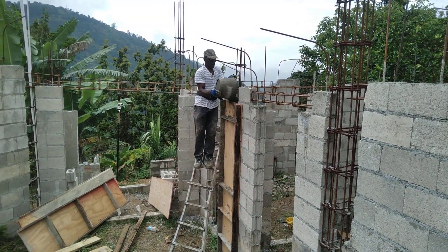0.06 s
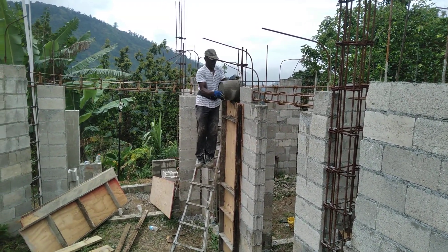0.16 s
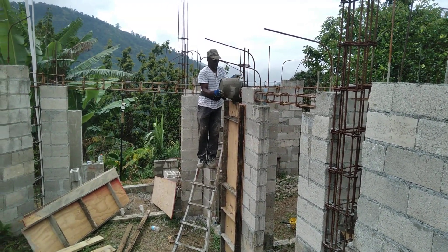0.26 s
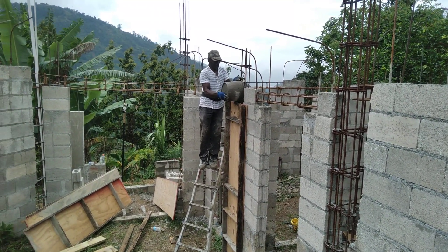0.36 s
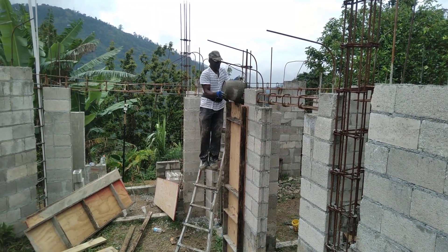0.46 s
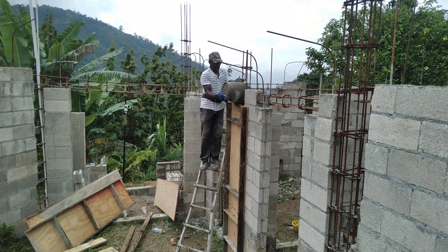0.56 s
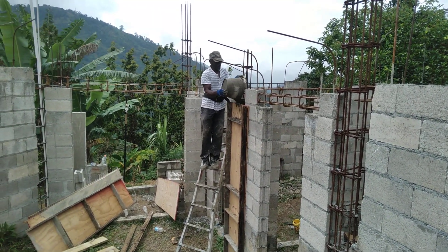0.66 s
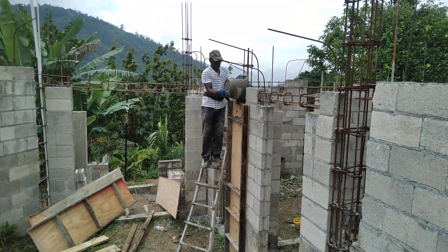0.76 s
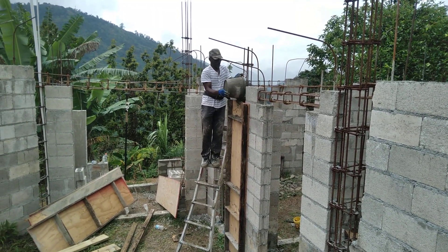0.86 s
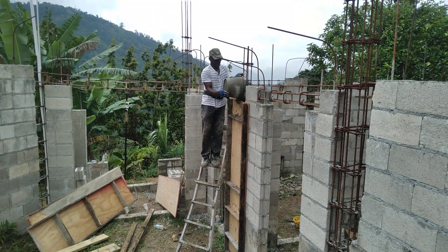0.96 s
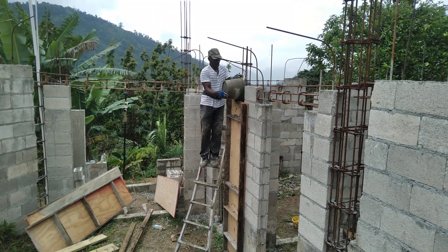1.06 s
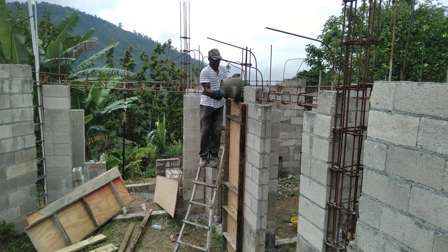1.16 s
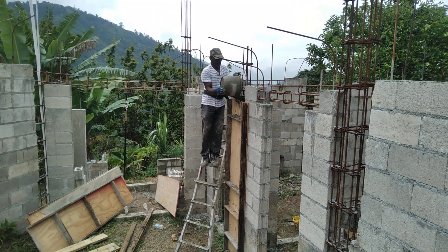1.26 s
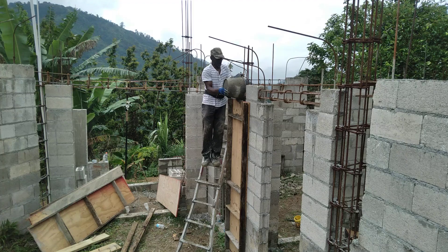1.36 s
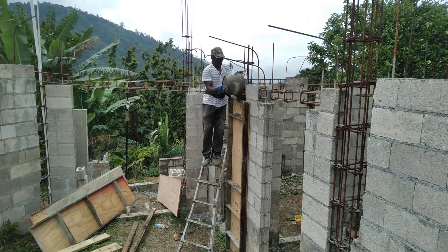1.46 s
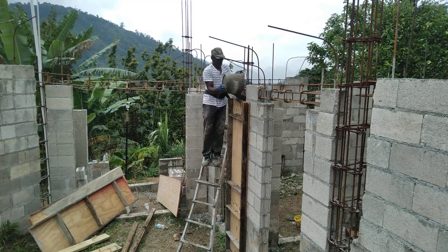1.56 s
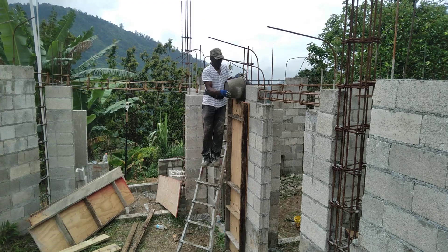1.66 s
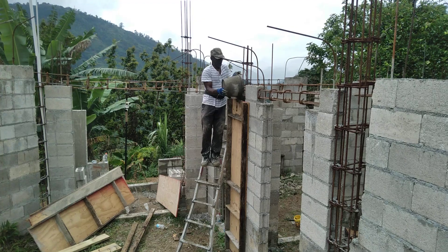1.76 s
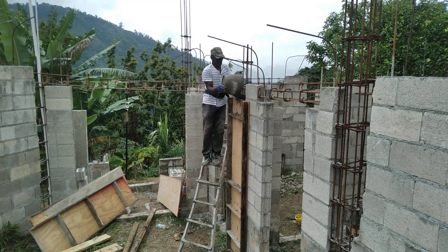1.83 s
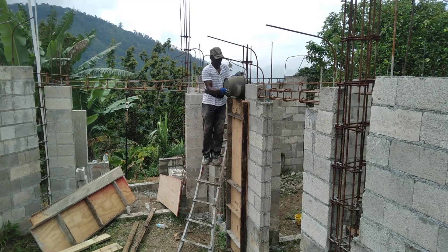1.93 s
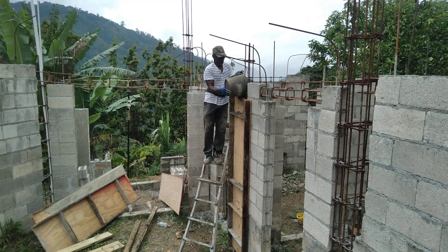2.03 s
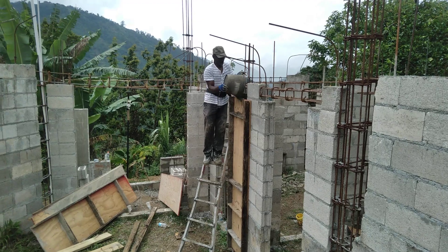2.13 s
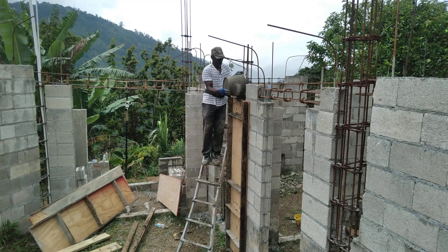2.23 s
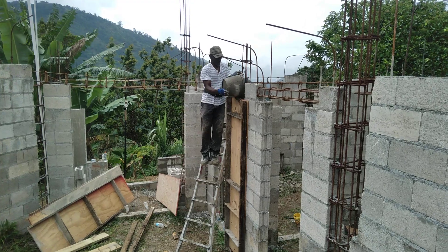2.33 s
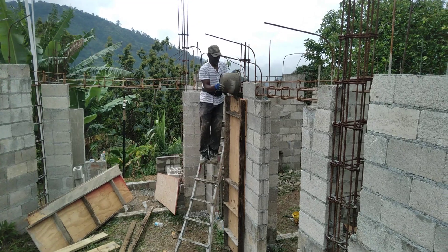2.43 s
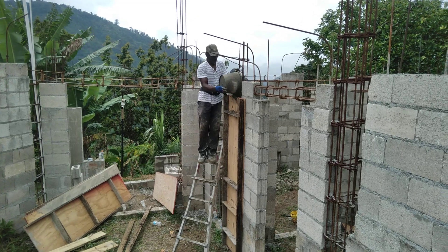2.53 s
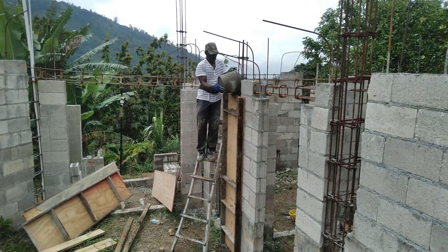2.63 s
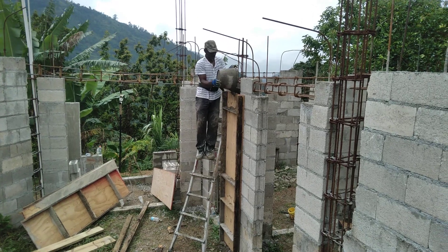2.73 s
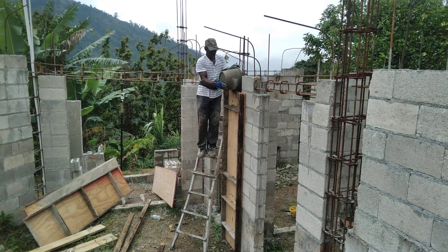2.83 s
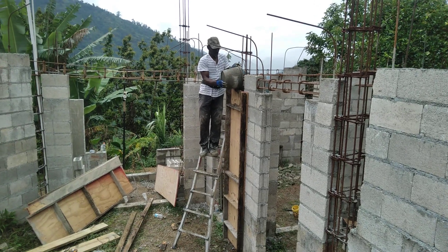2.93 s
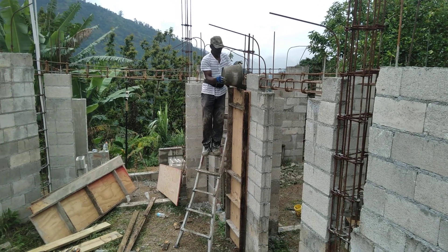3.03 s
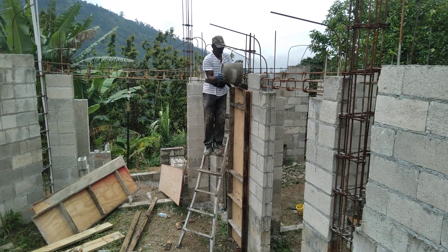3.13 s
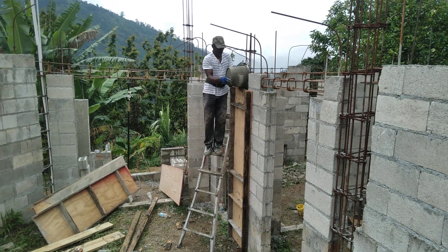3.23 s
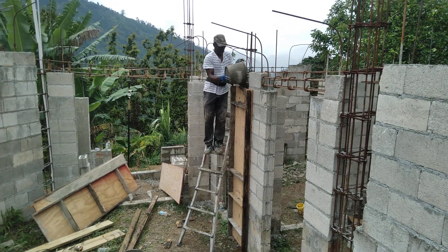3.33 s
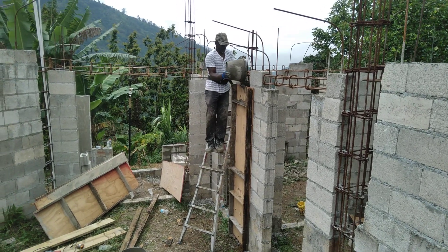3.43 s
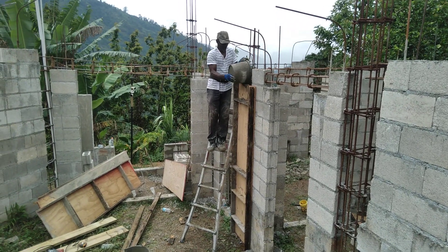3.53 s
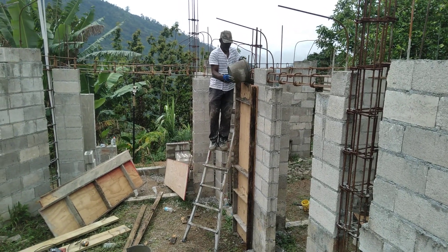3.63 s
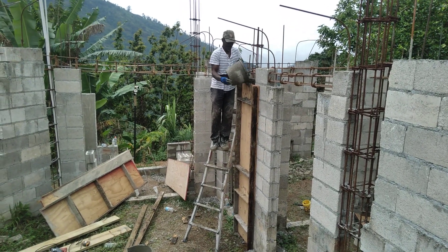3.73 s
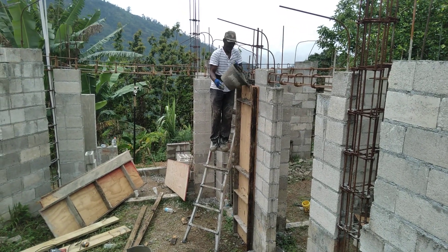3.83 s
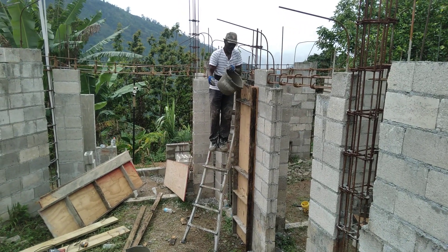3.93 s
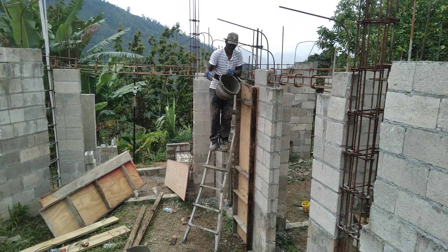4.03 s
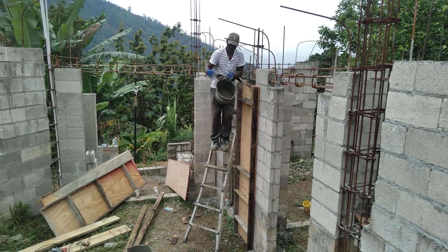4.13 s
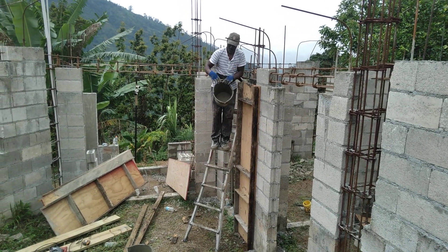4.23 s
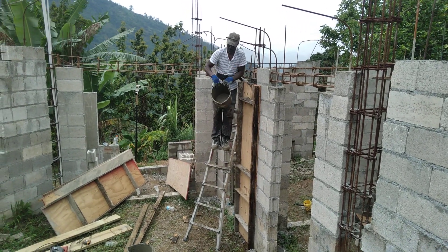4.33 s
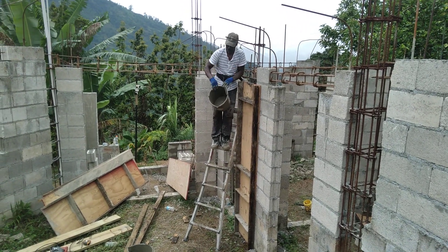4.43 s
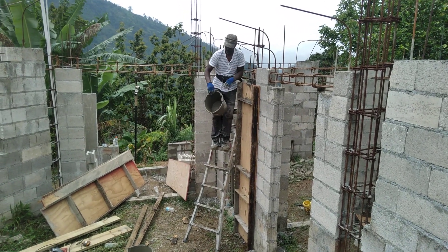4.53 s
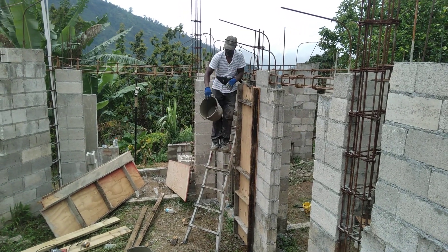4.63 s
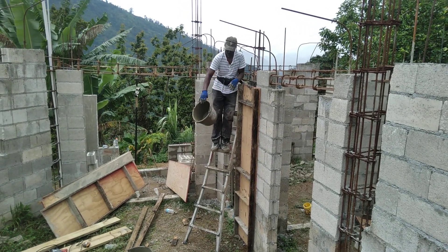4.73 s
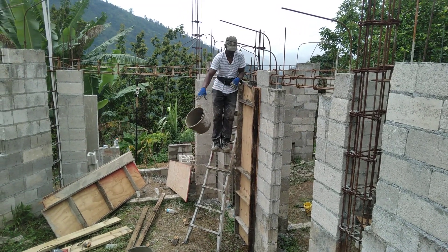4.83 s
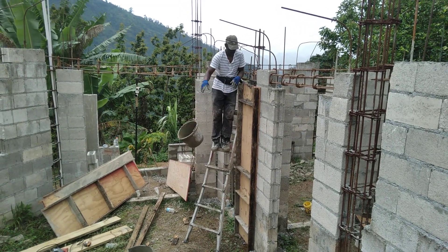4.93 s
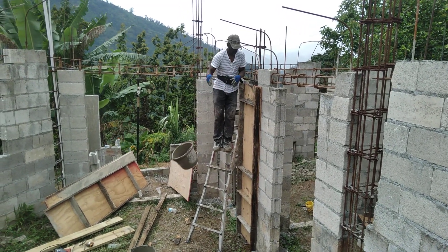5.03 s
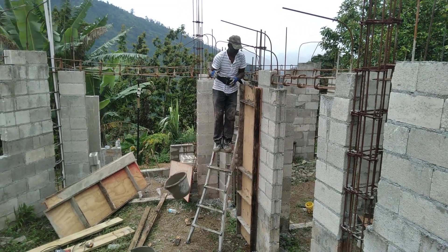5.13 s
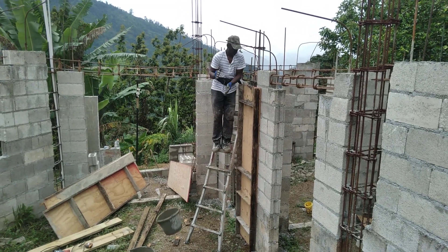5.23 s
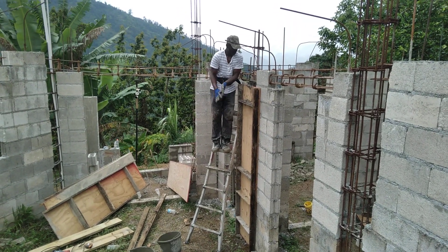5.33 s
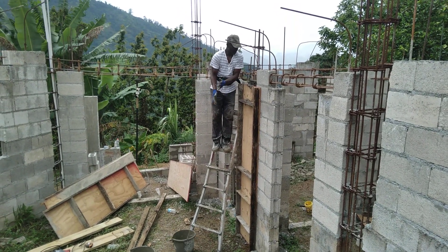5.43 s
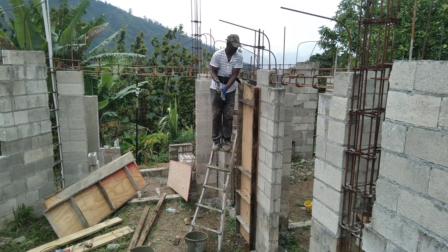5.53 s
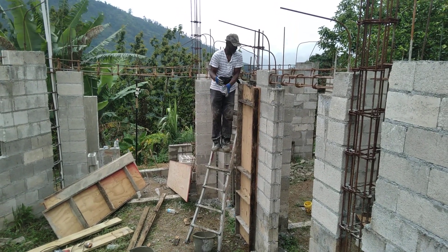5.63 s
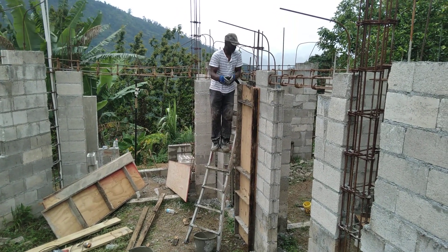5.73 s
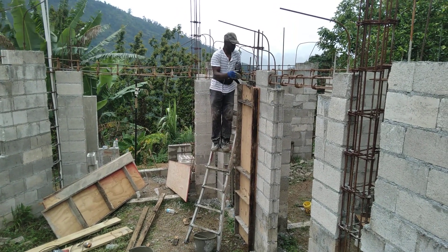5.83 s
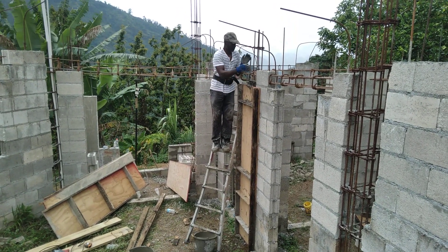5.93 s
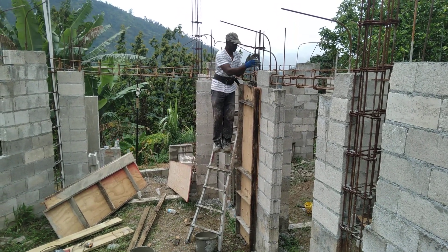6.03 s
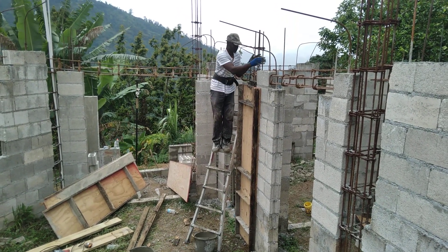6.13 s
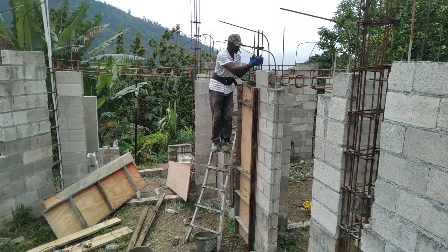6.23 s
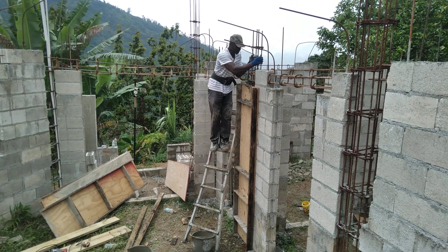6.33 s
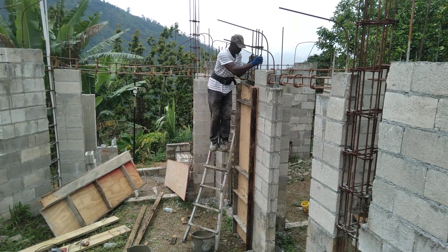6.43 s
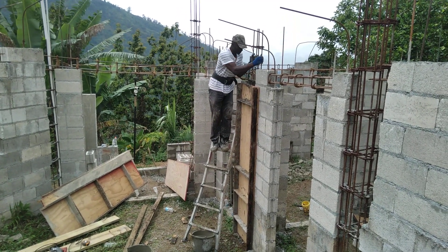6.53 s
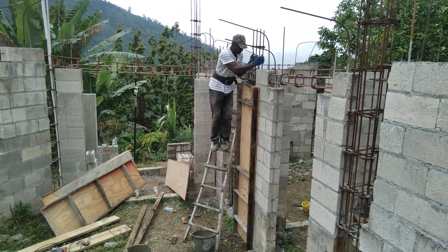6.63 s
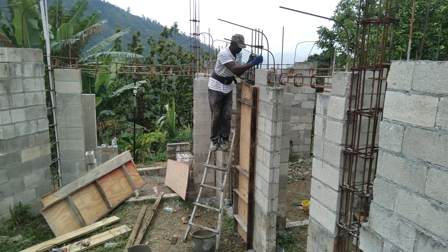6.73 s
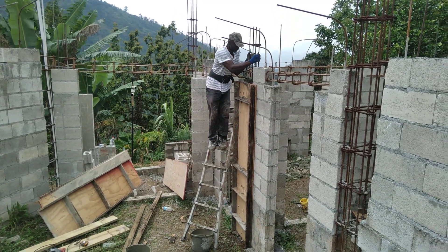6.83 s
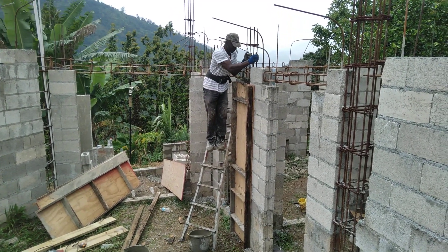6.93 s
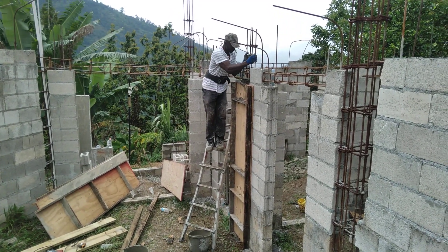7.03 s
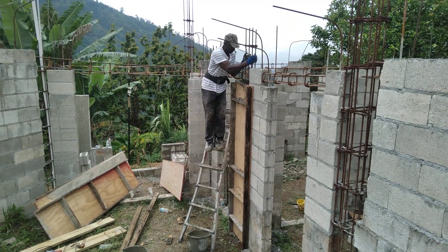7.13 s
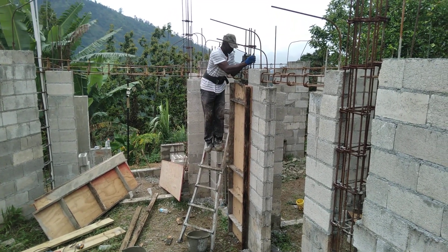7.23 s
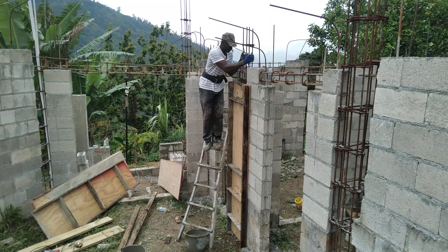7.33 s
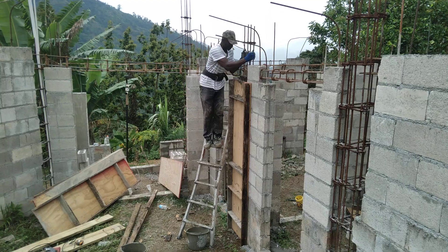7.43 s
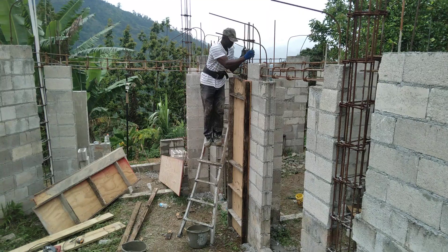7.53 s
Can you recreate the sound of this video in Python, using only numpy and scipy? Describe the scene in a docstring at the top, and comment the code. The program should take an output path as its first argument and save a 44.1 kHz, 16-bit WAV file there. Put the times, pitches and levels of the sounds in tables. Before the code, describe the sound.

Outdoors among block walls, a builder shakes a loaded plastic bucket against a wooden form: dull thumps, woody double clacks and gritty wet slides, with small clinks. After a short pause the empty bucket hits stony ground with a loud hollow boom, bounces and scuffs over gravel. Then only faint leaves, wind and tiny rustles. Microphone a few metres off, with short wall echoes.

```python
"""Outdoors, by a wooden form and block walls: a builder on a ladder shakes and knocks a plastic bucket
on the form so that wet concrete slides out, then lets the empty bucket fall on stony ground.
Knocks are noise crunches plus ringing modes, sliding is coloured grains, the falling bucket a set of modes.
Walls throw back short echoes; leaves hiss, chirps are sines, light wind buffets the microphone as low noise."""
import sys
import numpy as np
from scipy import signal
from scipy.fft import rfft, irfft
from scipy.io import wavfile
from scipy.ndimage import uniform_filter1d

SR = 44100
rng = np.random.default_rng(int(sys.argv[2]) if len(sys.argv) > 2 else 0)


def pcm_store(signal):
    """Save signal as 16-bit PCM."""
    levels = np.round(np.clip(np.atleast_2d(signal), -1, 1) * 32767)
    wavfile.write(sys.argv[1], SR, levels.astype(np.int16).T)


N = 333832
TIME = np.arange(N) / SR


def from_db(db):
    """Level in dB to amplitude."""
    return 10 ** (np.asarray(db) / 20)


def unit_energy(x):
    """Scale to a sum of squares of 1."""
    return x / np.sqrt(np.sum(x ** 2) + 1e-20)


def at_hz(points, hz):
    """Read a table along a log-frequency axis."""
    table = np.array(points)
    return np.interp(np.log(hz + 1), np.log(table[:, 0]), table[:, 1])


def in_time(rows):
    """Each column of a curve at every sample."""
    s, *columns = np.vstack(rows).T
    return [np.interp(TIME, s, column) for column in columns]


def wander(per_s):
    """Random level: a new normal value per_s times a second, straight lines between."""
    return np.interp(TIME * per_s, np.arange(SR), rng.standard_normal(SR))


def through(x, response):
    """Pass a sound through an impulse response."""
    return signal.fftconvolve(np.atleast_2d(x), np.atleast_2d(response), axes=-1)[:, :N]


def colour(x, spectrum, size=4096):
    """Causal (minimum-phase) filter with this spectrum; white input keeps its power."""
    gain = from_db(at_hz(spectrum, np.arange(size // 2 + 1) * SR / size))
    cepstrum = irfft(np.log(gain))
    cepstrum[1:size // 2] *= 2
    cepstrum[size // 2 + 1:] = 0
    return through(x, unit_energy(irfft(np.exp(rfft(cepstrum)))))


# Left-right likeness of diffuse sound. Each row: frequency in Hz, likeness 0-1.
LIKENESS_BY_HZ = [(60, 1), (290, 0.86), (640, 0.2), (1400, 0), (3000, 0), (12000, 0)]


def diffuse(size):
    """White stereo noise, alike in the bass and unrelated in the treble."""
    alike = np.clip(at_hz(LIKENESS_BY_HZ, np.arange(size // 2 + 1) * SR / size), -1, 1)
    mid, side = rfft(rng.standard_normal((2, size)))
    spectra = np.sqrt(1 + alike) * mid + np.sqrt(1 - alike) * side * [[1], [-1]]
    return irfft(spectra / np.sqrt(2), size)


def ring(modes):
    """One second of decaying sines, from modes of (Hz, dB, t60 s)."""
    t = TIME[:SR]
    return sum(from_db(db - 60 * t / t60) * np.sin(2 * np.pi * hz * t) for hz, db, t60 in modes)


def add(track, s, sound):
    """Mix a sound in at time s."""
    start = max(int(s * SR), 0)
    track[start:start + len(sound)] += sound[:N - start]


def pan(pan_db):
    """Left and right gains; positive favours the left."""
    return from_db([[pan_db / 2], [-pan_db / 2]])


def radiate(x, corner_hz):
    """A small body gives off little deep bass."""
    return signal.sosfilt(signal.butter(2, corner_hz, "high", fs=SR, output="sos"), x)


def soften(x, corner_hz):
    """A yielding contact lasts a while, so it rings no high notes."""
    return signal.sosfilt(signal.butter(2, corner_hz, fs=SR, output="sos"), x)


def distant(x, corner_hz):
    """Distance takes off the top."""
    return signal.sosfilt(signal.butter(3, corner_hz, fs=SR, output="sos"), x)


def grains(size, spread_db=4.0, per_s=5000):
    """Tiny clicks at random moments and of very uneven size; rms 1."""
    sizes = from_db(spread_db * np.minimum(rng.exponential(1, size), 4)) * rng.choice([-1, 1], size)
    clicks = sizes * (rng.random(size) < per_s / SR)
    return unit_energy(clicks) * np.sqrt(size)


def crunch(decay_s, snap=0.42, rise_s=0.0025, size=8192):
    """A contact: one snap, then sand crushed under it."""
    t = TIME[:size]
    envelope = np.exp(-t / max(decay_s, .001)) * (1 - np.exp(-t / rise_s))
    burst = unit_energy(grains(size) * envelope)
    burst[0] += snap
    return unit_energy(burst)


def contact(decay_s, spectrum, depth_db=3.0, count=22):
    """A crunch in the colour of the body; each contact point favours resonances of its own."""
    hz = np.geomspace(400, 9000, count)
    spot = np.c_[hz, depth_db * rng.standard_normal(count)]
    return unit_energy(colour(colour(crunch(decay_s), spot, size=1024), spectrum)[0])


# Background spectra. Each row: frequency in Hz, density in dB per Hz.
LEAF_SPECTRUM = [(900, -12), (1400, -2), (2200, -0.5), (3800, 0), (6000, -4), (8500, -7.5), (10200, -8),
                 (12000, -22), (16000, -29)]
VALLEY_SPECTRUM = [(60, -7.5), (150, 2.5), (330, -2), (550, -4), (850, -10), (1500, -18.5), (4000, -45.5),
                   (10000, -38.5), (16000, -56)]
# Relative levels of the open air. Each row: time in seconds, leaf hiss in dB, valley wash in dB.
AIR_LEVELS = [(0.0, -56.5, -54.5), (1.3, -65, -61), (2.5, -60.5, -58), (4.24, -65, -61.5),
              (5.3, -59.5, -57), (6.2, -62.5, -60.5), (7.57, -61.5, -54.5)]


def outdoors(leaves_db=3, valley_db=0, stir_db=0.62, stirs_per_s=9):
    """Leaves hiss as the breeze stirs them, over the dull wash of the valley."""
    hiss, wash = in_time(AIR_LEVELS)
    stir = stir_db * wander(stirs_per_s)
    leaves = from_db(hiss + leaves_db + stir) * colour(diffuse(N), LEAF_SPECTRUM)
    valley = from_db(wash + valley_db + stir) * colour(diffuse(N), VALLEY_SPECTRUM)
    return leaves + valley


# Rumble spectrum. Each row: frequency in Hz, density in dB per Hz.
WIND_SPECTRUM = [(15, 3), (35, -0.5), (70, -4), (110, -16), (170, -22.5), (300, -40), (700, -70)]
# Strength of the breeze. Each row: time in seconds, relative rumble level in dB.
GUST_LEVELS = [(0.0, -60), (0.5, -55), (1.4, -58), (2.4, -50), (2.8, -48.5), (3.3, -49), (3.95, -46),
               (4.17, -49), (4.3, -42.5), (4.8, -51), (5.08, -43.5), (5.25, -37.5), (5.75, -50),
               (6.12, -58), (6.45, -44), (7.15, -48.5), (7.43, -42.5), (7.57, -47)]
# Puffs on the microphone. Each row: time in seconds, relative level in dB.
PUFF_EVENTS = [(3.952, -26), (3.987, -21), (4.34, -29.5), (5.3, -27), (5.385, -18.5), (6.244, -26.5),
               (6.565, -28), (7.447, -26)]


def wind(level_db=1.5, pan_db=-3, shared=0.72, lumpy_db=4.5, lumps_per_s=11,
         puff_db=0, puff_hz=86, puff_t60_s=0.03):
    """Partly shared eddies rumble unevenly on the microphone ports; a few arrive as single puffs."""
    eddies = rng.standard_normal((2, N)) + shared * rng.standard_normal(N)
    uneven = lumpy_db * wander(lumps_per_s)
    rumble = from_db(in_time(GUST_LEVELS)[0] + level_db + uneven) * colour(eddies, WIND_SPECTRUM)
    onset = (1 - np.exp(-TIME[:SR] / 0.0025)) ** 2
    puffs = np.zeros(N)
    for s, db in PUFF_EVENTS:
        add(puffs, s - .005, 2 * onset * ring([(puff_hz, db + puff_db, puff_t60_s)]))
    return (rumble + puffs) * pan(pan_db)


# Grit spectrum. Each row: frequency in Hz, density in dB per Hz.
GRIT_SPECTRUM = [(900, -14), (1800, -0.5), (2800, 3.5), (4500, 2.5), (7000, -3), (8500, -8.5),
                 (10300, -3.5), (12000, -46), (16000, -49.5)]


def crumbs(per_s=12, level_db=-44, spread_db=1.8):
    """Stray bits of grit tick faintly now and then."""
    sizes = from_db(level_db + spread_db * np.minimum(rng.exponential(1, N), 3))
    return colour(sizes * (rng.random(N) < per_s / SR), GRIT_SPECTRUM)


# Shakes of the bucket: it hits the form, rebounds and hits again; levels are relative.
# Each row: start in seconds, first clack in dB, rebound delay in seconds, second clack in dB,
# thump in dB, grit in dB re the clack, concrete let go in dB.
SHAKE_EVENTS = [(0.032, -53, .015, -35.5, -52.5, -13.5, -43.5), (0.207, -51, .030, -42, -46, 2, -38),
                (0.453, -38.5, 0.011, -60, -34, -7.5, -43), (0.611, -41.5, .024, -37.5, -45, -7, -45),
                (0.843, -41.5, 0.032, -38.5, -47.5, -8.5, -42.5),
                (1.094, -36.5, .012, -45.5, -48, -1, -46.5), (1.448, -46, 0.0087, -42, -38, -10.5, -47),
                (1.711, -36, .040, -31.5, -37, -8, -38.5), (2.008, -31.5, .045, -41.5, -25.5, -6, -35.5),
                (2.327, -33, .020, -30, -37.5, -7.5, -32.5), (2.621, -32, 0.025, -38.5, -31.5, -8, -38),
                (2.905, -34, .033, -38, -35, -7.5, -43), (3.292, -27.5, .015, -42, -37, -9.5, -41),
                (3.579, -42, .014, -58, -44.5, -5, -57)]
# Lone bumps on the boards. Each row: start in seconds, relative clack in dB, relative thump in dB.
BUMP_EVENTS = [(0.693, -39.5, -50.5), (4.392, -47, -60), (4.459, -57, -55)]
# Kinds of contact: thump pitch in Hz, thump weight in dB, crunch decay in seconds.
FIRST_CONTACT, SECOND_CONTACT = (226.5, 0, 0.0074), (293, -7, 0.01)
BUMP_CONTACT, BUMP_GRIT_DB = (455, 0, .013), -16


def blows():
    """Two blows per shake, one per bump: (s, clack dB, thump dB, grit dB re the clack, contact)."""
    hits = []
    for s, first, rebound_s, second, thump, grit, _ in SHAKE_EVENTS:
        hits.append((s, first, thump, grit, FIRST_CONTACT))
        hits.append((s + rebound_s, second, thump, grit, SECOND_CONTACT))
    for s, clack, thump in BUMP_EVENTS:
        hits.append((s, clack, thump, BUMP_GRIT_DB, BUMP_CONTACT))
    return hits


# Boards of the form. Each row: mode in Hz, level in dB, t60 in seconds.
FORM_MODES = [(157, -18, 0.25), (191, 0, 0.069), (283, -11.5, 0.22), (333, -12, 0.18), (372, -20.5, 0.15),
              (482, -12.5, 0.05)]
# Rim on wood. Each row: frequency in Hz, density in dB per Hz.
CLACK_SPECTRUM = [(250, -22.5), (500, 2), (700, -4.5), (850, 5.5), (980, -3), (1300, -6.5), (1700, -5.5),
                  (2400, -15.5), (5000, -32), (13000, -39)]


def knocks(clack_db=23, grit_db=23.5, thump_db=7.5, boards_db=5.0, thump_t60_s=0.093):
    """The loaded bucket gives a dead thump, the boards ring on and the rim clacks on sandy wood."""
    rim, body = np.zeros((2, N))
    boards = ring(FORM_MODES)
    for s, clack, thump, grit, (hz, weight_db, decay_s) in blows():
        add(rim, s, from_db(clack + clack_db) * contact(decay_s, CLACK_SPECTRUM))
        add(rim, s, from_db(clack + grit + grit_db) * contact(decay_s, GRIT_SPECTRUM, depth_db=-0.5))
        add(body, s + 0.0017, from_db(thump + weight_db + thump_db) * ring([(hz, 0, thump_t60_s)]))
        add(body, s, from_db(thump + weight_db + boards_db) * boards)
    return radiate(rim + soften(body, 1300), 240)


LUMP_DB, LUMP_LAG_S = -1.5, 0.0033


def lumps(hz=78, t60_s=0.49, rise_s=0.0047):
    """The concrete of each shake lands softly and sets the tall hollow of the form humming."""
    onset = 1 - np.exp(-TIME[:SR] / rise_s)
    out = np.zeros(N)
    for s, _, rebound_s, _, _, _, concrete in SHAKE_EVENTS:
        add(out, s + rebound_s + LUMP_LAG_S, onset * ring([(hz, concrete + LUMP_DB, t60_s)]))
    return out


# The slide is fastest just after the second contact.
SLIDE_LAG_S, SLIDE_SWELL_S, SLIDE_FADE_S = .016, 0.022, 0.023
RASP_DB, RASP_DB_PER_S = -1, -9   # stones rasp less as the bucket empties
SLIDE_GRIT_DB = -7.5


def slides():
    """Every shake lets concrete slide: (s, rasp dB, hollow dB, grit dB, swell s, fade s)."""
    strokes = []
    for s, _, rebound_s, clack, _, grit, concrete in SHAKE_EVENTS:
        peak_s = s + rebound_s + SLIDE_LAG_S
        rasp = concrete + RASP_DB + RASP_DB_PER_S * s
        strokes.append((peak_s, rasp, concrete, clack + grit + SLIDE_GRIT_DB, SLIDE_SWELL_S, SLIDE_FADE_S))
    return strokes


# Hollow of the bucket. Each row: frequency in Hz, density in dB per Hz.
HOLLOW_SPECTRUM = [(50, -29.5), (78, -7), (110, -11.5), (220, 2), (295, -1), (390, -2), (470, -17.5),
                   (620, -15.5), (1000, -45.5)]


def sliding(rows, treble, stutter_db=1.5, slips_per_s=170):
    """Grains swell and fade, stuttering as if catching and slipping, and sound a hollow body."""
    rasp, hollow, grit = drive = np.zeros((3, N))
    for s, rasp_db, hollow_db, grit_db, swell_s, fade_s in rows:
        stroke = np.exp(-np.maximum((s - TIME) / swell_s, (TIME - s) / fade_s).clip(0, 20))
        drive += from_db([[rasp_db], [hollow_db], [grit_db]]) * stroke
    slips = from_db(stutter_db * wander(slips_per_s))
    layers = [(rasp, CLACK_SPECTRUM), (hollow, HOLLOW_SPECTRUM), (grit, treble)]
    return sum(colour(level * slips * grains(N, per_s=1300), spectrum) for level, spectrum in layers)


# Clinks of stones and the rim on steel, and one hard clack of the bucket on the form.
# Each row: start in seconds, relative level in dB, pitch in Hz, ring in dB added to the row's own level.
CLINK_EVENTS = [(1.221, -50.5, 2850, -18), (1.537, -43, 2330, -25), (2.116, -44.5, 2513, 1),
                (2.120, -43, 1180, -3), (2.473, -50, 2660, 8), (2.473, -49, 4700, -3),
                (2.978, -47.5, 10300, -20), (3.104, -59, 3020, -7), (3.168, -37, 3310, -13),
                (3.167, -38.5, 7340, -11), (3.293, -31, 1100, -13)]
CLINK_CRUNCH_S = 0.0088


def clinks(level_db=25, t60_s=0.09, tick_db=-1):
    """A rough tick around one pitch, and a short damped ring with its overtones."""
    out = np.zeros(N)
    for s, db, hz, ring_db in CLINK_EVENTS:
        around = [(hz / 4, -30), (hz / 2, -10), (hz, 0), (hz * 1.54, -5), (hz * 3, -22)]
        tick = colour(crunch(CLINK_CRUNCH_S), around)[0]
        tone = unit_energy(ring([(hz, 0, t60_s), (hz * 1.9, -6, t60_s / 2), (hz * 1.4, -5, t60_s / 2)]))
        add(out, s, from_db(db + level_db + tick_db) * tick)
        add(out, s, from_db(db + level_db + ring_db) * tone)
    return signal.sosfilt(signal.butter(6, 10800, fs=SR, output="sos"), out)


DIP_STARTS_S, DIP_S = [1.326, 3.885, 4.274], .05


def dipping(x, depth_db=-13, corner_hz=800):
    """The treble dips briefly now and then, while the bass carries on."""
    dips = sum(1. * ((TIME > start) & (TIME < start + DIP_S)) for start in DIP_STARTS_S)
    dipped = uniform_filter1d(dips, size=300)
    bass = signal.sosfiltfilt(signal.butter(2, corner_hz, fs=SR, output="sos"), x)
    return bass + (x - bass) * from_db(depth_db * dipped)


# Faint chirps from the bushes. Each row: centre in seconds, level in dB.
CHIRP_EVENTS = [(3.086, -59), (4.115, -65), (6.47, -64), (7.0, -66)]


def chirps(hz=7580, length_s=0.012, glide_hz_per_s=-3000):
    """Short, thin whistles that fall slightly."""
    t = TIME[:SR // 5] - .1
    bell = np.exp(-(t / length_s) ** 2 / 2)
    whistle = bell * np.sin(2 * np.pi * (hz + glide_hz_per_s * t / 2) * t)
    out = np.zeros(N)
    for s, db in CHIRP_EVENTS:
        add(out, s + t[0], from_db(db) * whistle)
    return out


# Faint rustles of handling and a few falling crumbs.
# Each row: peak in seconds, relative level in dB, swell in seconds.
RUSTLE_EVENTS = [(3.215, -58.5, .027), (4.395, -60, 0.013), (4.83, -61.5, 0.048), (5.04, -62, 0.0037),
                 (5.338, -60.5, 0.0033), (6.649, -60.5, .02), (7.264, -59, 0.0043), (7.396, -52, .002),
                 (7.498, -54.5, 0.0073)]
RUSTLE_HOLLOW_DB, RUSTLE_GRIT_DB, RUSTLE_FADE_S = 3.5, 3.5, 0.024


def rustles():
    """Faint rustles of handling and a few falling crumbs, as strokes all of one colour."""
    return [(s, db, db + RUSTLE_HOLLOW_DB, db + RUSTLE_GRIT_DB, swell_s, RUSTLE_FADE_S)
            for s, db, swell_s in RUSTLE_EVENTS]


# Falling bucket on the ground; levels are relative.
# Each row: start in seconds, clack in dB, boom in dB, gravel in dB, pitch in Hz.
LANDING_EVENTS = [(5.391, -17, -2, -22.5, 339.5), (5.4021, -28, -25, -29, 340),
                  (5.4081, -46, 2.5, -29, 300.2), (5.4713, -65, -21.5, -43.5, 312.6),
                  (5.562, -36, -41, -27, 343), (5.591, -31.5, -35, -34, 293), (5.641, -58, -30, -47, 304),
                  (5.713, -36, -37, -58, 298), (5.746, -31, -37, -33.5, 314),
                  (5.986, -41, -36.5, -48.5, 573)]
# Modes of the empty bucket. Each row: multiple of its pitch, level in dB, share of the boom's t60.
BUCKET_MODES = [(1, 0, 1), (1.21, -11, 1.1), (.645, -18, 1.2), (1.62, -31, 1.1), (1.95, -26, 1),
                (2.38, -29, .7), (2.82, -17, .6), (3.24, -24, .55), (3.42, -26, .55), (4.23, -26, .5)]
# Plastic wall on the ground, and gravel. Each row: frequency in Hz, density in dB per Hz.
CRACK_SPECTRUM = [(250, -21), (450, -11), (680, -7), (870, 3.5), (1050, -1.5), (1300, -2), (1600, -9.5),
                  (2200, -8.5), (5000, -30)]
GRAVEL_SPECTRUM = [(900, -16), (1800, 0.5), (2700, 5.5), (4200, 4.5), (7000, -5), (10300, -11.5),
                   (12000, -28.5), (16000, -40)]
BOOM_HZ, BOOM_T60_S, SQUASH_DAMPING = 304.5, .12, 2.0
LANDING_CRUNCH_S, CRUNCH_HALVES_DB = .012, 13   # decay at a -40 dB clack; harder ones crush faster


def landings(clack_db=25.0, gravel_db=26, boom_db=3, boom_pan_db=-2, shortest_t60_s=0.092):
    """The empty bucket booms like a drum, higher and shorter while squashed; gravel crunches under it."""
    stones, boom = np.zeros((2, N))
    for s, clack, boom_level, gravel, hz in LANDING_EVENTS:
        decay_s = LANDING_CRUNCH_S * .5 ** ((clack + 40) / CRUNCH_HALVES_DB)
        t60_s = max(BOOM_T60_S * (BOOM_HZ / hz) ** SQUASH_DAMPING, shortest_t60_s)
        modes = [(hz * multiple, db, t60_s * share) for multiple, db, share in BUCKET_MODES]
        add(stones, s, from_db(clack + clack_db) * contact(decay_s, CRACK_SPECTRUM, depth_db=2.5))
        add(stones, s, from_db(gravel + gravel_db) * contact(decay_s, GRAVEL_SPECTRUM, depth_db=0.0))
        add(boom, s, -from_db(boom_level + boom_db) * ring(modes))
    return stones + radiate(soften(boom, 1100), 320) * pan(boom_pan_db)


def spray(sand_db=-21, rumble_db=-22, t60_s=1.0):
    """Each landing throws up sand that patters down again, over a dull rumble from the yard."""
    power = sum(from_db(gravel - 60 * np.abs(TIME - s) / t60_s) ** 2 * (TIME > s)
                for s, _, _, gravel, _ in LANDING_EVENTS)
    sand = from_db(sand_db) * colour(diffuse(N), GRAVEL_SPECTRUM)
    rumble = from_db(rumble_db) * colour(diffuse(N), VALLEY_SPECTRUM)
    return np.sqrt(power) * (sand + rumble)


# Bucket scuffing over gravel between bounces.
# Each row: peak in seconds, relative level in dB, swell in seconds, fade in seconds.
SCUFF_EVENTS = [(5.51, -39.5, 0.018, .02), (5.605, -33.5, 0.023, 0.023), (5.755, -35, 0.036, 0.042),
                (5.998, -50, 0.0061, 0.042)]
SCUFF_HOLLOW_DB, SCUFF_GRIT_DB = 1, -5


def scuffs():
    """Strokes of the bucket over the gravel, all of one colour."""
    return [(s, db, db + SCUFF_HOLLOW_DB, db + SCUFF_GRIT_DB, swell_s, fade_s)
            for s, db, swell_s, fade_s in SCUFF_EVENTS]


def yard(x, echoes, tail_db, t60_s, lag_s, pan_db, scatter_hz):
    """Direct sound, slaps from the block walls and a scattered tail, thin in the bass."""
    t = TIME[:SR]
    noise = radiate(diffuse(SR), scatter_hz)
    low = signal.sosfilt(signal.butter(1, 2500, fs=SR, output="sos"), noise)
    decaying = low * from_db(-60 * t / t60_s) + (noise - low) * from_db(-60 * t / (1.01 * t60_s))
    response = from_db(tail_db) * unit_energy(decaying * (1 - np.exp(-t / 0.00067)))
    direct = (0.00032, 0.014, lag_s)
    for delay_s, db, later_s in [direct] + echoes:
        response[0, int(abs(delay_s) * SR)] += from_db(db)
        response[1, int(abs(delay_s + later_s) * SR)] += from_db(db)
    return through(x, response) * pan(pan_db)


# Wall echoes from the ladder and from the ground.
# Each row: delay in seconds, level in dB, right ear later by seconds (negative: earlier).
LADDER_ECHOES = [(.0065, -13.5, .0003), (0.0147, -14, 0.0034), (0.042, -11.5, -0.041), (0.08, -44, .0002)]
GROUND_ECHOES = [(.0232, -24, .0002), (.11, -34, -.0003)]


def scene():
    """Work at the top of the form and the fall to the ground, each with its own echoes, in the open air."""
    pouring = knocks() + lumps() + clinks() + crumbs()
    pouring = pouring + from_db(-1) * sliding(slides() + rustles(), GRIT_SPECTRUM)
    falling = landings() + from_db(0.5) * sliding(scuffs(), GRAVEL_SPECTRUM, stutter_db=2.5)
    at_form = yard(pouring, LADDER_ECHOES, tail_db=0.0, t60_s=0.24, lag_s=0, pan_db=-2.5, scatter_hz=261)
    at_ground = yard(falling, GROUND_ECHOES, tail_db=0.5, t60_s=0.14, lag_s=.00012, pan_db=-3.0,
                     scatter_hz=650)
    work = distant(at_form, corner_hz=11800) + distant(at_ground + spray(), corner_hz=15000)
    return dipping(work + outdoors()) + chirps() + wind()


CUTOFF_HZ = 15900


def record(dry):
    """The loudest peaks are rounded off and the top is cut."""
    rounded = dry / (1 + dry ** 4) ** (1 / 4)
    return signal.sosfilt(signal.ellip(10, .1, 80, CUTOFF_HZ, fs=SR, output="sos"), rounded)


dry = scene()
out = record(dry)
pcm_store(out)
```